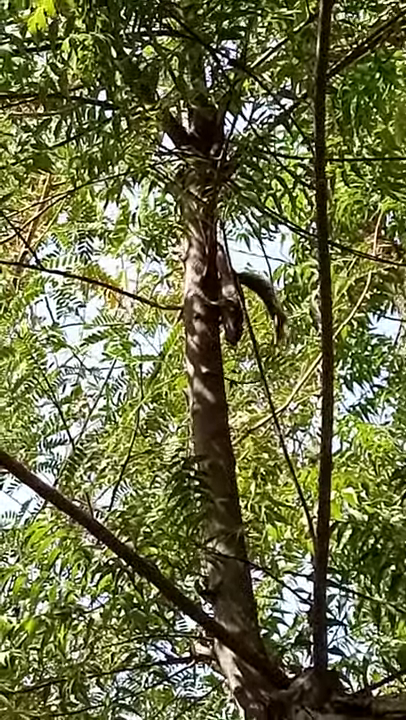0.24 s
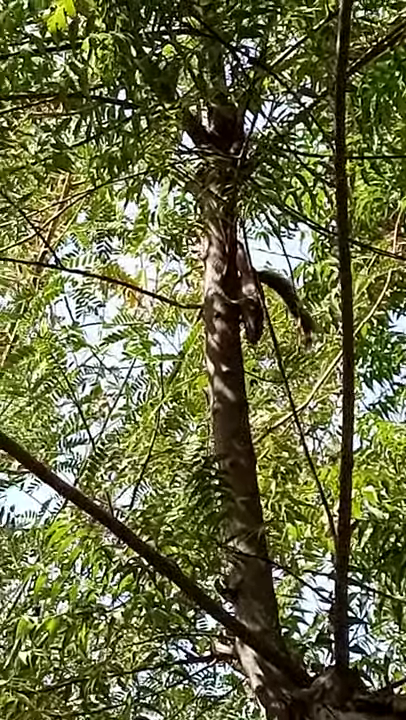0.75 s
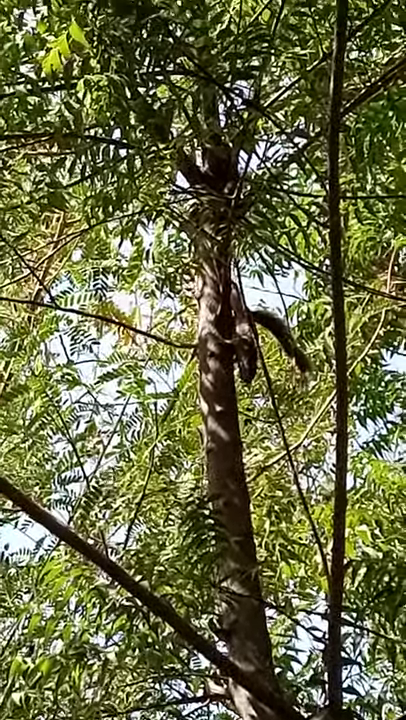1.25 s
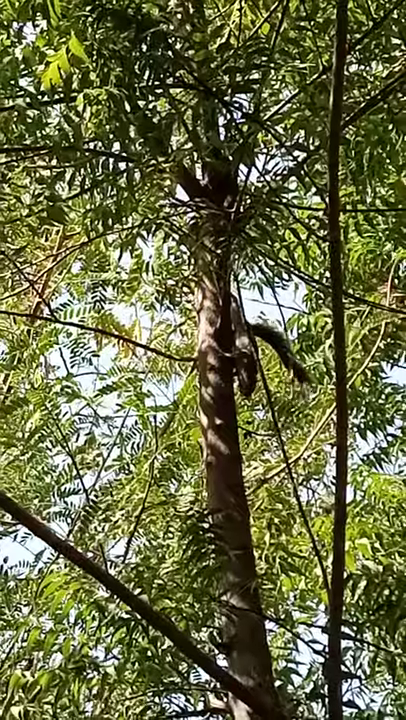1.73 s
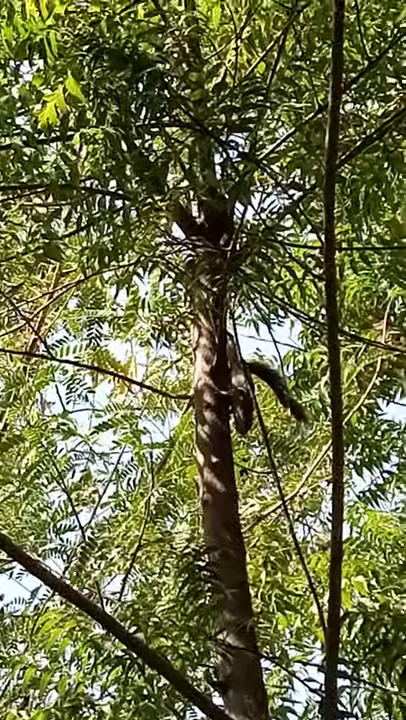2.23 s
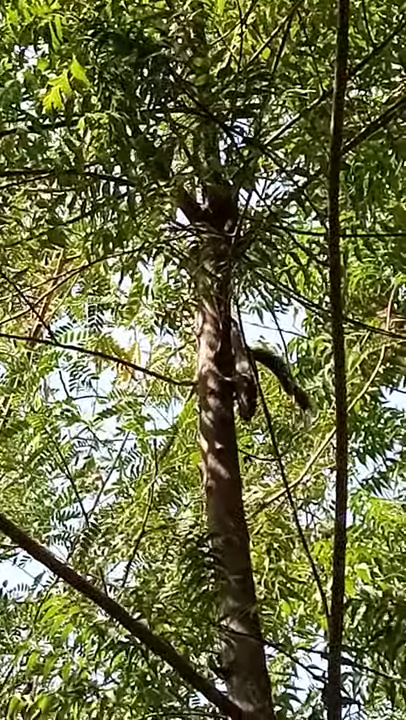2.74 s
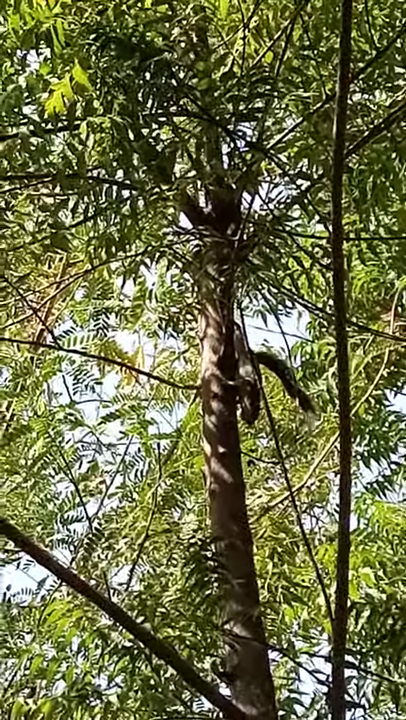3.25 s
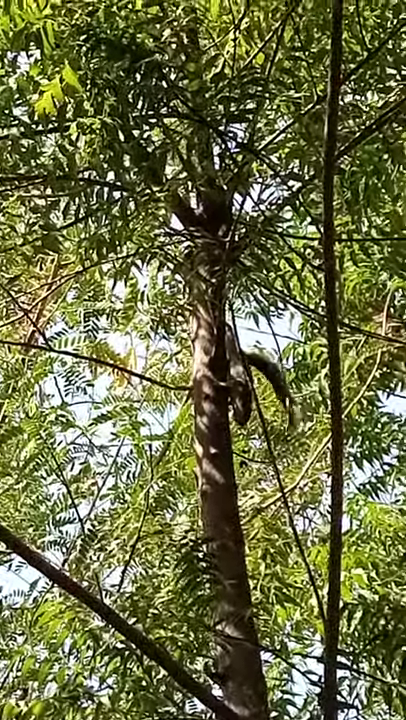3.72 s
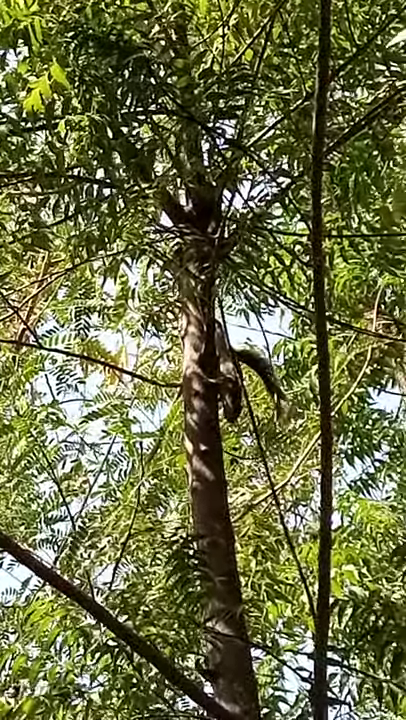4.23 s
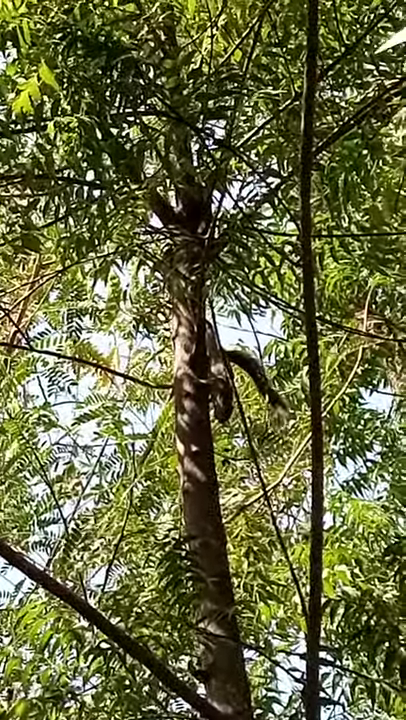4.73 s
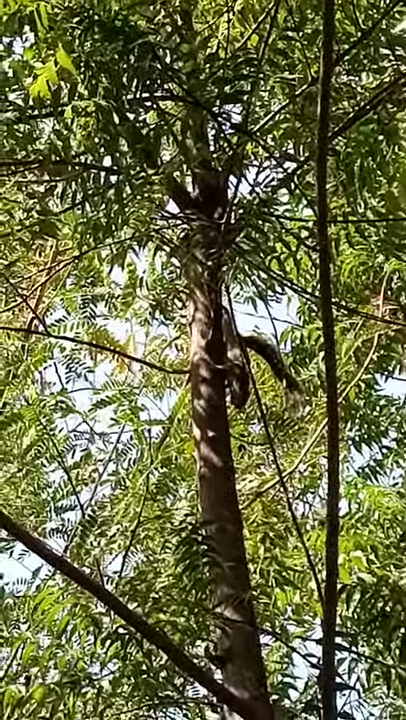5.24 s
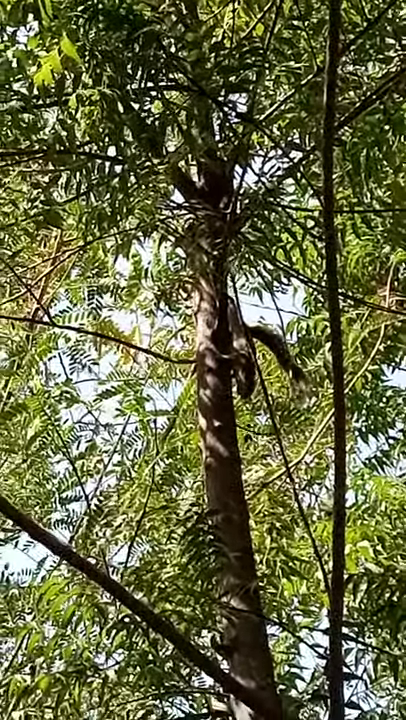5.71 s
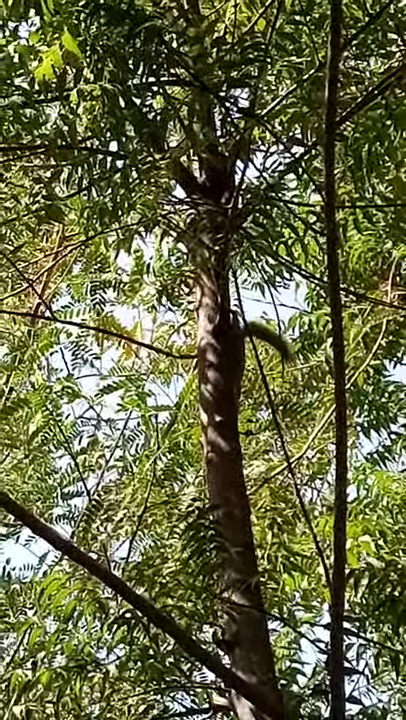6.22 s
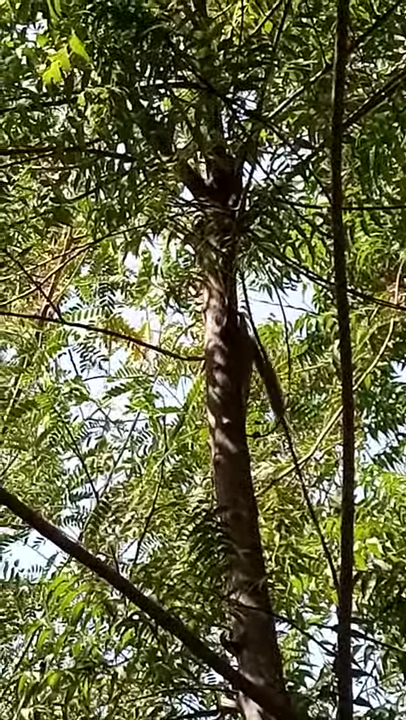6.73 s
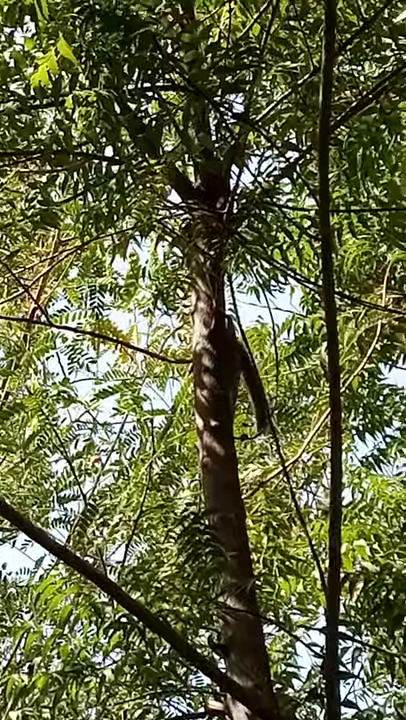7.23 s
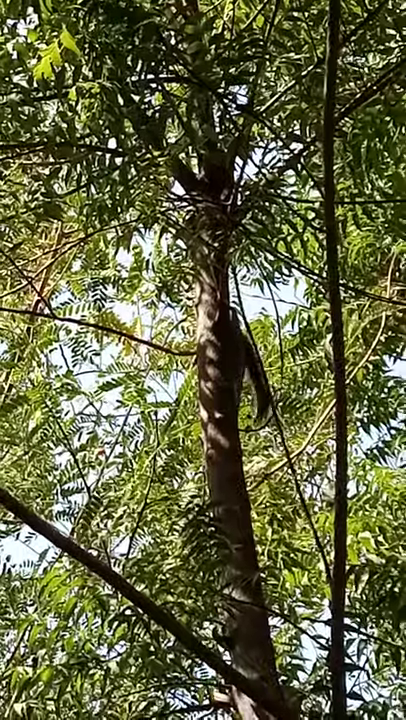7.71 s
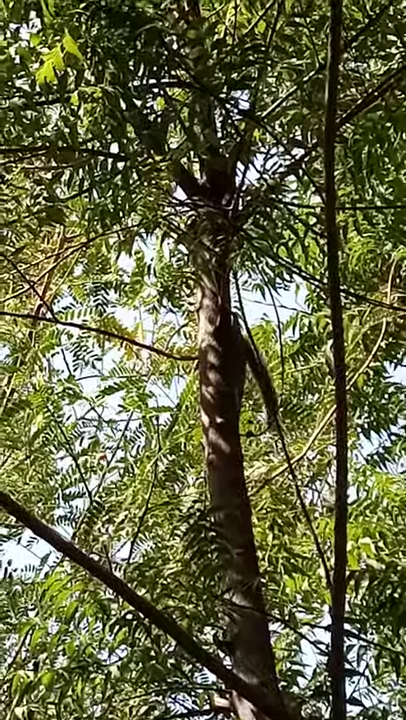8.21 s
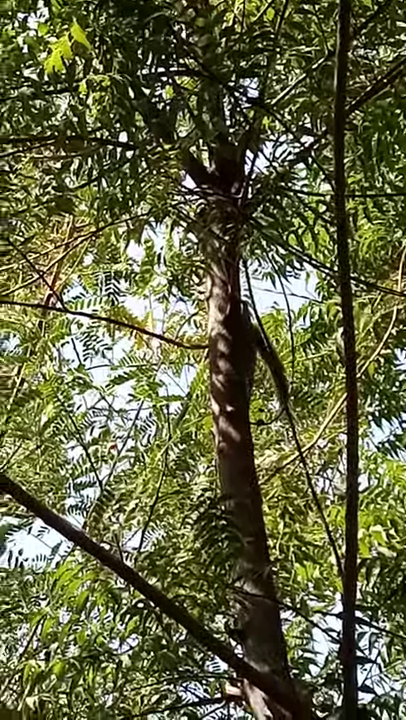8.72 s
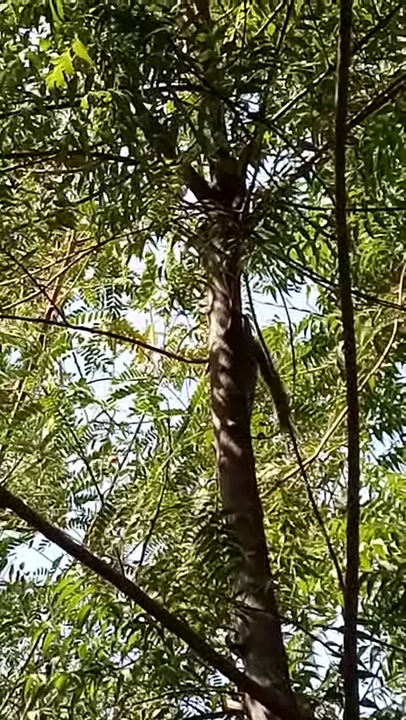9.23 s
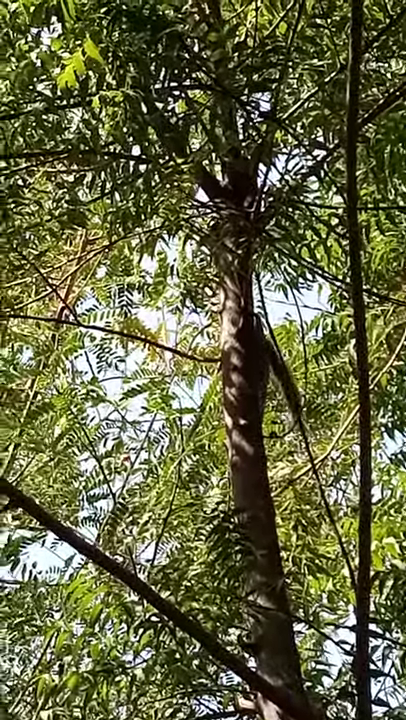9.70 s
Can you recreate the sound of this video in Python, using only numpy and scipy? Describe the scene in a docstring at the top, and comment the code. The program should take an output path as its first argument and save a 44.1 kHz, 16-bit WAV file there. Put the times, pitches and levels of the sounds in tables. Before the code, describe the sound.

Quiet open air with a low rumble and soft hiss, in a grove heard by one microphone, the same in both channels. From 0.16 s a palm squirrel gives loud, sharp chirps every 0.4 to 0.6 s, each a roughly 40 ms whistle darting up very high and dropping, followed by a short diffuse echo from the foliage. A more distant bird answers with hoarse, rattling rasps of about 0.3 s, faint at 0.5 s, growing to their strongest around 4.6 to 5.5 s. From 5.4 to 6.2 s come quick, soft, high ticks, with two louder, lower chirps at 5.95 and 6.02 s, the first with a low overload bump. Another lower chirp at 6.6 s carries a much fainter bump. Steady chirps continue to 9.6 s, gradually rising again, while the rasps weaken. Thin, regular peeps and barely audible low notes sit far behind.

```python
"""A grove under quiet outdoor air, heard by one microphone: a palm squirrel on a tree trunk gives sharp alarm chirps.
Each chirp is a roughly 40 ms whistle that climbs, catching on throat resonances, crests and falls.
Midway comes a quick run of soft, flat-topped ticks, with louder, lower chirps among them.
Further off a bird scolds in rasps of shaped noise; faint wavering tones make peeps and low notes beyond it.
Trees scatter every call as diffuse echoes; the microphone overloads in low bumps under two of the loudest chirps."""
import sys
import numpy as np
from scipy import signal
from scipy.fft import rfft, irfft, next_fast_len
from scipy.io import wavfile
from scipy.ndimage import uniform_filter1d, map_coordinates

SR = 44100
rng = np.random.default_rng(int(sys.argv[2]) if len(sys.argv) > 2 else 0)


def store_wav(level_fs):
    """Save 16-bit WAV to argv[1]."""
    pcm = np.round(np.clip(np.atleast_2d(level_fs), -1, 1) * 32767)
    wavfile.write(sys.argv[1], SR, pcm.T.astype(np.int16))


N = 439233  # samples


def amp(db):
    """Amplitude factor for a level in dB."""
    return 10 ** (np.asarray(db) / 20)


def unit(x):
    """Scale to an RMS of one."""
    return x / np.sqrt(np.mean(x ** 2) + 1e-20)


def along(points, hz):
    """Read (Hz, value) points on a log frequency axis."""
    f, v = np.transpose(points)
    return np.interp(np.log(hz + 1e-6), np.log(f), v)


def wobble(rate, size):
    """A smooth random curve, rate knots a second."""
    knots = rng.standard_normal(int(size * rate / SR) + 4)
    return map_coordinates(knots, [np.arange(size) * rate / SR])


def filtered(x, response):
    """Shape the spectrum of x by a response of frequency."""
    m = next_fast_len(len(x) + 8192)
    spectrum = rfft(x, m) * response(np.fft.rfftfreq(m, 1 / SR))
    return irfft(spectrum, m)[:len(x)]


def add(track, s, sound):
    """Mix a sound into the track from time s, cut at the track's ends."""
    i = round(s * SR)
    part = sound[max(-i, 0):N - i]
    track[max(i, 0):][:len(part)] += part


def patchy_noise(size, depth_db):
    """Noise that swells and fades in small patches of time and frequency."""
    z = signal.stft(rng.standard_normal(size), nperseg=1024)[2]
    field = uniform_filter1d(rng.standard_normal(z.shape), size=3, axis=0)  # across frequency
    field = uniform_filter1d(field, size=11, axis=1)  # across time
    return signal.istft(z * amp(depth_db * unit(field)), nperseg=1024)[1][:size]


# strength of scattering in the foliage: (frequency [Hz], relative level [dB])
LEAF_SCATTER = [(2000, 3), (4500, 0.5), (10000, 6.5), (15000, 1.5)]
# time to die away by 60 dB, before the decay factor: (frequency [Hz], time [s])
GROVE_DECAY = [(1500, 0.41), (4500, 0.41), (10000, 0.23), (15000, 0.12)]


def scatter(decay_factor, build):
    """A diffuse echo that builds up over build seconds and decays at a rate set by frequency."""
    hz, t, z = signal.stft(rng.standard_normal(SR // 2), SR, nperseg=128)
    strength_db = along(LEAF_SCATTER, hz)[:, None]
    t60 = decay_factor * along(GROVE_DECAY, hz)[:, None]
    tail = signal.istft(z * amp(strength_db - 60 * t / t60), SR, nperseg=128)[1]
    tail = tail * (1 - np.exp(-(np.arange(len(tail)) / SR / build) ** 2))
    return tail / np.linalg.norm(tail)


def among_trees(x, near_db, far_db):
    """The direct sound, a quick spray from nearby leaves and a longer one from the grove."""
    leaves = scatter(decay_factor=0.33, build=0.0013)
    grove = scatter(decay_factor=0.98, build=0.0083)
    path = amp(near_db) * leaves + amp(far_db) * grove
    path[0] += 1  # direct sound
    return signal.fftconvolve(x, path)


# colour of the open air: (frequency [Hz], relative level per Hz [dB])
AIR_COLOUR = [(25, -7.5), (60, -3), (160, -0.5), (300, -9), (550, -9.5), (1000, -15), (2200, -17),
              (3800, -15), (5200, -25.5), (5850, -11), (7000, -29), (9000, -27.5), (12000, -38),
              (15000, -45.5)]


def air(level_db=-76, drift_db=1):
    """A quiet, slowly drifting outdoor rumble and hiss, made of patchy noise."""
    noise = patchy_noise(N, depth_db=3.5)
    hiss = unit(filtered(noise, lambda hz: amp(along(AIR_COLOUR, hz))))
    return hiss * amp(level_db + drift_db * wobble(2.7, N))


def far_birds(notes, length, waver):
    """Faint notes from far away: sines of randomly wavering pitch, swelling and fading once."""
    track, size = np.zeros(N), int(length * SR)
    for s, db, hz in notes:
        pitch = hz * (1 + waver * wobble(220, size))
        note = np.sin(2 * np.pi * np.cumsum(pitch) / SR) * np.hanning(size)
        add(track, s - length / 2, amp(db) * among_trees(note, near_db=-4, far_db=-1.5))
    return track


# far-off low notes, before the trees scatter them: (middle time [s], level [dB], mean pitch [Hz])
LOW_NOTES = [(.12, -93.5, 538), (1.27, -84, 560), (3.05, -84, 449), (3.25, -84, 544), (8.68, -83, 728),
             (9.5, -78.5, 873)]


def hoots():
    """Low wavering notes at the edge of hearing."""
    return far_birds(LOW_NOTES, length=0.14, waver=0.033)


PEEP_FIRST_S, PEEP_EVERY_S = .04, .385  # the steady pace, before chance
PEEP_HZ, PEEP_DB = 5900, -76.5  # means, before chance and scattering


def peeps(spread_s=.025, spread_db=2.0, spread_hz=110):
    """A train of faint thin peeps, each a little off in time, level and pitch."""
    chance = rng.standard_normal((26, 3)) * [spread_s, spread_db, spread_hz]
    notes = [(PEEP_FIRST_S + i * PEEP_EVERY_S + late, PEEP_DB + db, PEEP_HZ + hz)
             for i, (late, db, hz) in enumerate(chance)]
    return far_birds(notes, length=0.05, waver=0.072)


# the bird's throat: (multiple of its lowest resonance [ratio], gain [dB])
BILL_RESONANCES = [(.65, -39), (.85, -12), (.95, -4), (1.03, 2.5), (1.13, -10.5), (1.35, -16), (1.75, -6.5),
                   (1.95, -6), (2.15, 3.5), (2.7, 0.5), (3.3, -11), (4, -14.5), (5, -29), (5.9, -25),
                   (7.3, -46)]


def rasp(length, hz, bright_db, whistle_db, arch, rough_db=2.0, attack=0.014, release=0.047,
         whistle_ratio=2.0, whistle_hz=300):
    """A hoarse, rattling hiss whose resonances rise and sink as the bill opens and closes."""
    size = int((length + release / 2) * SR)
    t = np.arange(size) / SR

    def colour(f):
        whistle = whistle_db / (1 + ((f - whistle_ratio * hz) / whistle_hz) ** 2)
        return amp(along(BILL_RESONANCES, f / hz) + bright_db * np.log2((f + 1) / hz) + whistle)

    hiss = filtered(patchy_noise(2 * size, depth_db=1.2), colour)
    # reading the hiss faster lifts its resonances
    opening = 1 + arch * (np.sin(np.pi * t / t[-1]) - 2 / np.pi)
    rattle_db = rough_db * wobble(260, size) + 0.4 * wobble(23, size)
    voice = map_coordinates(hiss, [np.cumsum(opening)]) * amp(rattle_db)
    return unit(voice) * np.clip(t / attack, 0, 1) * np.clip((t[-1] - t) / release, 0, 1)


# distant rasps, level before the trees and the final scaling:
# (start [s], end before the release tail [s], level [dB], lowest resonance [Hz], brightness [dB per octave])
SCOLDS = [(0.488, 0.816, -69, 1675, -6.5), (1.234, 1.557, -65, 1690, -1.5), (1.881, 2.201, -60, 1682, -2),
          (2.47, 2.753, -58.5, 1650, -4.5), (3.198, 3.534, -60.5, 1703, -1.5), (3.998, 4.203, -59, 1630, 0),
          (4.197, 4.478, -59, 1725, -1), (4.633, 4.925, -56, 1656, 2.5), (5.13, 5.555, -54.5, 1788, 1.5),
          (5.768, 5.945, -59, 1620, -3.5), (6.177, 6.446, -57, 1657, 1), (6.621, 6.933, -56.5, 1605, -2),
          (7.115, 7.41, -57.5, 1610, -1), (7.694, 7.979, -60, 1530, 2.5), (8.244, 8.465, -60.5, 1565, 1),
          (8.704, 8.989, -61, 1578, 0.5), (9.317, 9.543, -62, 1535, 2), (9.584, 9.795, -71, 1850, -3)]
WHISTLE_DB, WHISTLE_PER_DULLNESS = 3.5, 3  # whistling resonance [dB]; its gain [dB] per dB/octave of dullness


def scolding_bird(gape=.8):
    """Distant rasps, heard largely by way of the trees; longer ones open wider, duller ones whistle more."""
    track = np.zeros(N)
    for start, end, db, hz, bright_db in SCOLDS:
        whistle_db = WHISTLE_DB - WHISTLE_PER_DULLNESS * bright_db
        voice = rasp(end - start, hz, bright_db, whistle_db, arch=gape * (end - start) ** 2)
        heard = among_trees(voice, near_db=-9.5, far_db=-2.5) / np.sqrt(2)
        add(track, start, amp(db) * heard)
    return track


# the microphone overloading, before its treble response: (peak time [s], peak level [dB])
OVERLOADS = [(5.967, -44), (6.612, -66.5)]


def overload_bumps(hz=75):
    """The microphone overloads under two loud chirps: one low swing each, with a shallow dip either side."""
    track, t = np.zeros(N), np.arange(N) / SR
    for s, db in OVERLOADS:
        u = np.pi * hz * (t - s)
        track += amp(db) * (1 - 2 * u ** 2) * np.exp(-u ** 2)
    return track


CREST_SHARE, END_HZ = .52, 3200  # where in its length the dome crests; the pitch it falls to


def pitch_arch(t, length, top_hz, throat, catches, start_hz, climb_hz_per_s, flatness):
    """Pitch at times t: a fast climb that catches on the throat's resonances, a rounded crest and a fall."""
    steps = np.linspace(start_hz, top_hz, 300)
    # a climbing pitch lingers where it or its octave meets a resonance
    lingering = sum(stay * np.tanh((steps / throat - hz) / width) / 2 for hz, width, stay, _ in catches)
    reached = steps / climb_hz_per_s + lingering
    climb = np.interp(t, reached - reached[0], steps)
    from_crest = np.abs((t / length - CREST_SHARE) / (1 - CREST_SHARE))
    dome = top_hz - (top_hz - END_HZ) * from_crest ** flatness
    return uniform_filter1d(np.maximum(np.minimum(climb, dome), start_hz), size=16)


# the squirrel's throat, before each call's resonance factor: (frequency [Hz], gain [dB])
SQUIRREL_THROAT = [(1500, -44.5), (2050, -28.5), (3100, -19), (4400, 0), (5100, -5.5), (5600, -14.5),
                   (6400, -11), (8200, -14.5), (9500, -2), (10500, 2), (11200, -13.5), (12100, -13),
                   (13300, -12.5), (15600, -9.5)]
HOLD_S, SAG_S = .009, 0.017  # how long the push stays full; how soon it sags after that
ATTACK_S, RISE_S = 0.0018, .0014  # when the push is half on; how gradually it comes on
RELEASE_S = 0.0038  # how long the push takes to end


def chirp(t, arch, db, throat, catches, sag_db, bright_db=0, loud_db=-15, rolloff_db=8, softening=.5,
          jitter=0.015):
    """One arch: harmonics flash as they sweep through throat resonances; soft calls have weaker overtones."""
    pitch = arch * (1 + jitter * wobble(900, len(t)))
    phase = 2 * np.pi * np.cumsum(pitch) / SR
    k = np.arange(1, 7)[:, None]  # harmonic numbers
    slope_db = rolloff_db + softening * (loud_db - db)
    # the voice is buzzy when low and nearly pure when high
    overtone_loss_db = slope_db * np.log2(k) * pitch / 5000 + 9.9 * np.maximum(k - 3, 0)
    level_db = along(SQUIRREL_THROAT, k * pitch / throat) - overtone_loss_db
    audible = np.clip((17000 - k * pitch) / 1500, 0, 1)
    voice = (amp(level_db) * audible * np.sin(k * phase)).sum(0)
    # the voice swells, or dips, one width above each catch
    swell_db = sum(gain * np.exp(-((arch / throat - hz) / width - 1) ** 2) for hz, width, _, gain in catches)
    tilt_db = bright_db * np.log2(arch / SQUIRREL_THROAT[3][0])  # pivots on the 4.4 kHz resonance
    tired = 1 - np.exp(-(np.maximum(t - HOLD_S, 0) / SAG_S) ** 2)
    push = np.clip((t[-1] - t) / RELEASE_S, 0, 1) / (1 + np.exp((ATTACK_S - t) / RISE_S))
    return voice * push * amp(db + swell_db + tilt_db - sag_db * tired)


# alarm chirps on the trunk, level before throat, trim and trees:
# (start [s], level [dB], top pitch [Hz], length [s], throat resonance factor [ratio], brightness [dB per octave])
ALARM_CHIRPS = [(0.1589, -17.5, 13570, 0.049, 1.048, 0.0), (0.5602, -16.5, 12920, 0.042, 1.042, 0.0),
                (0.951, -18.5, 13090, 0.04, 1.047, 0.0), (1.5827, -17.5, 12700, 0.043, 1.03, -0.5),
                (2.0465, -17.5, 12810, 0.04, 1.032, 0.0), (2.4978, -16.5, 13220, 0.043, 1.046, -0.5),
                (2.912, -17.0, 12900, 0.045, 1.048, 0.0), (3.3217, -17.5, 13450, 0.044, 1.054, 0.5),
                (3.7393, -16, 12460, 0.041, 1.016, -0.5), (4.1881, -17.0, 13060.0, 0.043, 1.035, 0.0),
                (4.5862, -17, 13500, 0.047, 1.032, -0.5), (4.9883, -17.5, 12760.0, 0.044, 1.05, 0.0),
                (5.4373, -17.0, 13240, 0.046, 1.02, 0.5), (5.95, -14.5, 9560, 0.028, 0.91, 0),
                (6.0212, -15, 10200, 0.038, 0.81, -0.5), (6.5952, -15, 10070, 0.036, 0.94, -1.5),
                (7.135, -16.5, 10830, 0.039, 0.97, -1), (7.6291, -17.5, 11590, 0.042, 0.98, -1.5),
                (8.0999, -18.0, 11370, 0.043, 1.005, -1.5), (8.5294, -17.5, 12630, 0.048, 0.99, -1),
                (9.094, -17.0, 11980, 0.04, 0.99, -1), (9.5534, -16.5, 11560, 0.042, 0.99, -1)]
# where a chirp's climb catches, before the resonance factor: (pitch [Hz], width [Hz], stay [s], swell [dB])
CHIRP_HOLDS = [(2147, 98, .003, 1.5), (4630, 440, .0035, 1), (10000, 550, .0059, -1.5)]
# the run of soft ticks, level before throat, trim and trees: (start [s], level [dB], top pitch [Hz])
SOFT_TICKS = [(5.4242, -33.5, 13500), (5.5105, -34.5, 13370), (5.5943, -33.5, 13900),
              (5.6836, -34.5, 14390), (5.7858, -34, 14400), (5.8833, -34, 14100), (6.1609, -34.5, 14160)]
# where a tick's climb catches, before the resonance factor: (pitch [Hz], width [Hz], stay [s], swell [dB])
TICK_HOLDS = [(4510, 140, 0.0055, 2.8), (10800, 550, 0.0032, 2)]
TICK_S, TICK_THROAT = .043, .84  # length; throat resonance factor
EASY_HZ, SAG_DB_PER_OCTAVE = 8600, 20  # the higher a chirp climbs above an easy pitch, the more its push sags


def squirrel(chirp_db=-0.5, tick_db=-1.5):
    """Loud chirps and soft, flat-topped ticks; each takes a new path through the foliage."""
    track = np.zeros(N)
    lead = .008  # s of run-in for the gradual attack
    for s, db, top_hz, length, throat, bright_db in ALARM_CHIRPS:
        t = np.arange(-lead, length, 1 / SR)
        arch = pitch_arch(t, length, top_hz, throat, CHIRP_HOLDS, start_hz=2040, climb_hz_per_s=2200000,
                          flatness=2.2)
        sag_db = SAG_DB_PER_OCTAVE * np.log2(top_hz / EASY_HZ)
        voice = chirp(t, arch, db, throat, CHIRP_HOLDS, sag_db, bright_db)
        add(track, s - lead, amp(chirp_db) * among_trees(voice, near_db=-6.5, far_db=-14.5))
    for s, db, top_hz in SOFT_TICKS:
        t = np.arange(-lead, TICK_S, 1 / SR)
        arch = pitch_arch(t, TICK_S, top_hz, TICK_THROAT, TICK_HOLDS, start_hz=3600, climb_hz_per_s=1150000,
                          flatness=2.8)
        voice = chirp(t, arch, db, TICK_THROAT, TICK_HOLDS, sag_db=7.5, rolloff_db=13.5)
        add(track, s - lead, amp(tick_db) * among_trees(voice, near_db=-8.0, far_db=-8))
    # keeps the chirps and ticks free of low clicks
    low_cut = signal.butter(8, 1750, "highpass", fs=SR, output="sos")
    return signal.sosfilt(low_cut, track)


def scene():
    """The grove from the far air to the trunk, the same in both channels."""
    distance = air() + hoots() + peeps()
    mono = distance + scolding_bird() + overload_bumps() + squirrel()
    return np.array([mono, mono])


# the microphone's response: (frequency [Hz], gain [dB])
MICROPHONE_RESPONSE = [(12800, 0.5), (13800, -7), (14900, 11), (15700, 18)]
TOP_HZ = 15950  # middle of the 200 Hz wide band edge


def record(dry):
    """The microphone rings in the top treble; nothing is kept above the band edge."""
    def response(hz):
        band = np.clip((TOP_HZ - hz) / 200 + .5, 0, 1)
        return amp(along(MICROPHONE_RESPONSE, hz)) * band

    return np.array([filtered(side, response) for side in dry])


dry = scene()
out = record(dry)
store_wav(out)
```